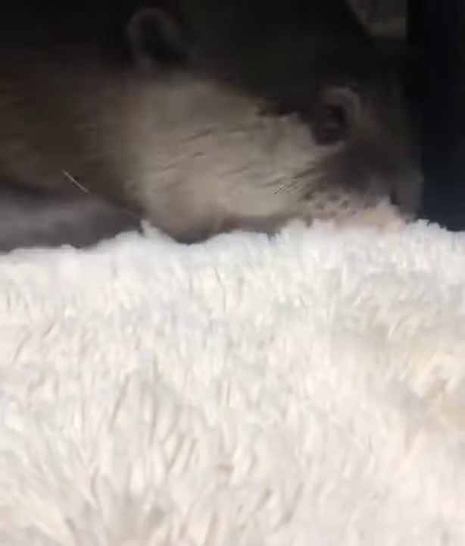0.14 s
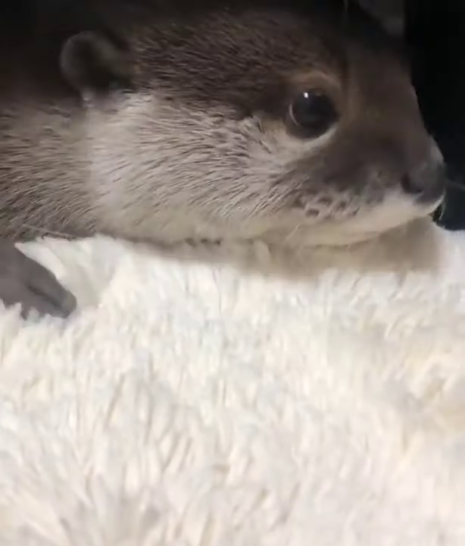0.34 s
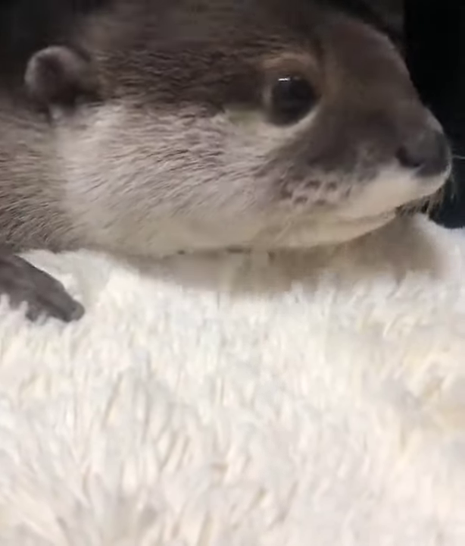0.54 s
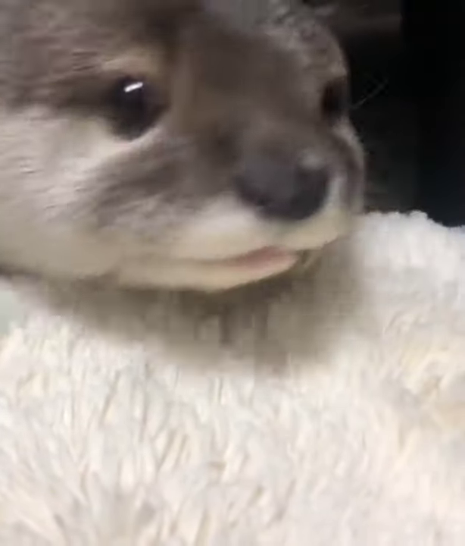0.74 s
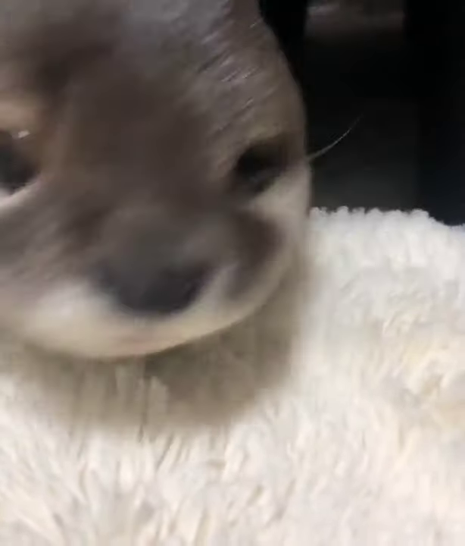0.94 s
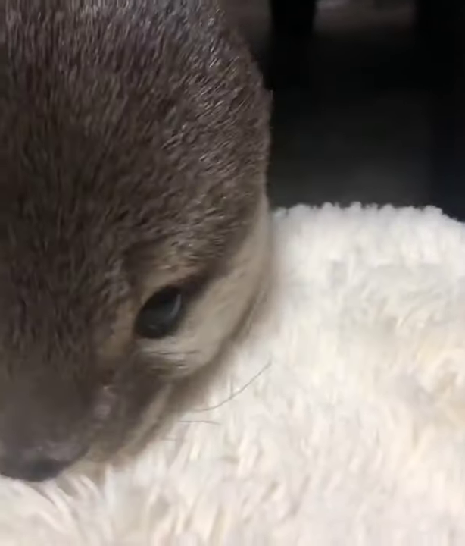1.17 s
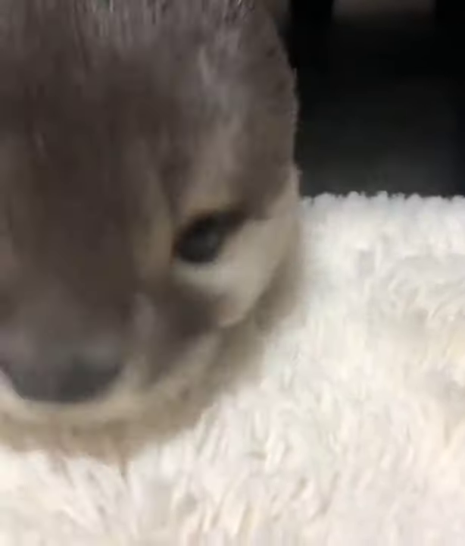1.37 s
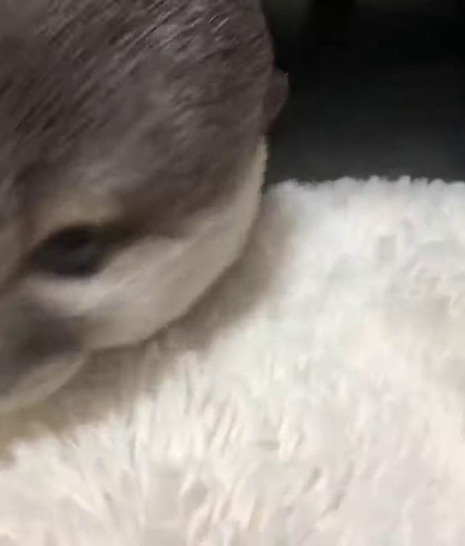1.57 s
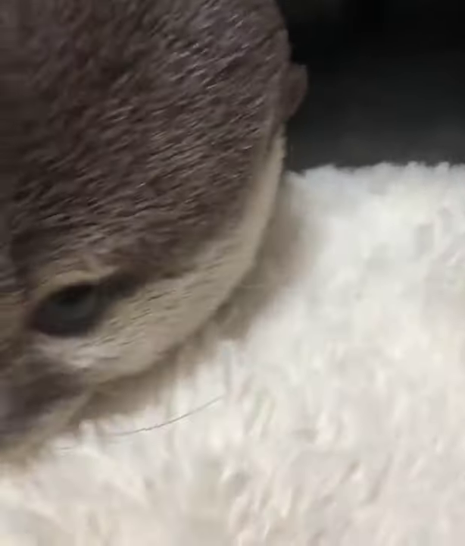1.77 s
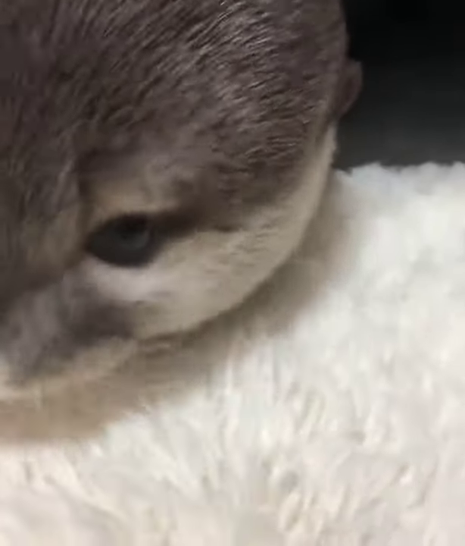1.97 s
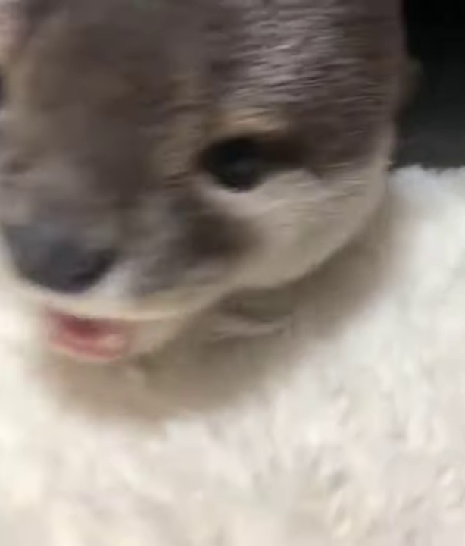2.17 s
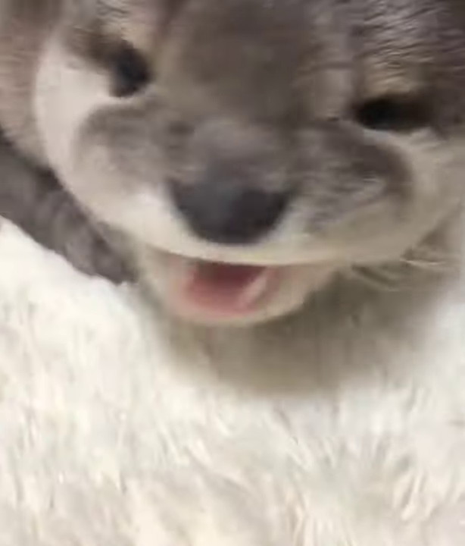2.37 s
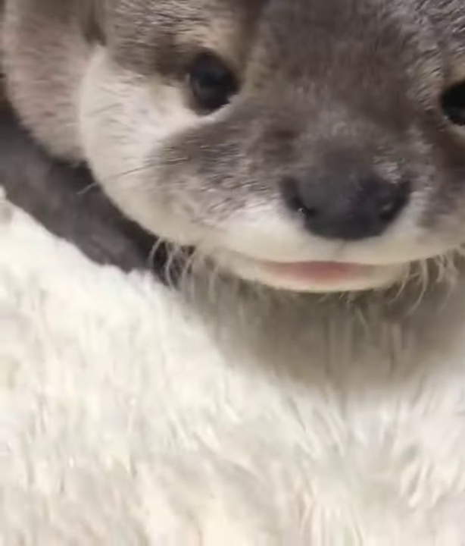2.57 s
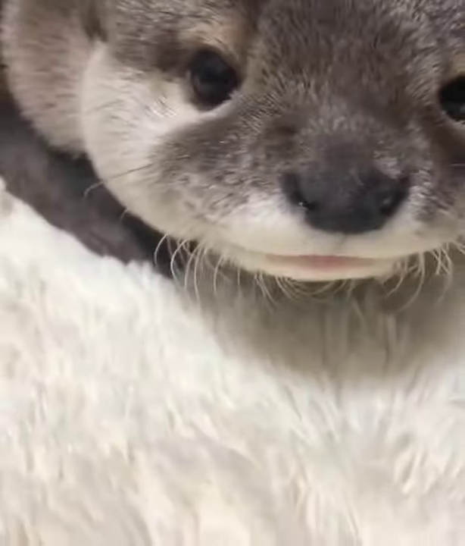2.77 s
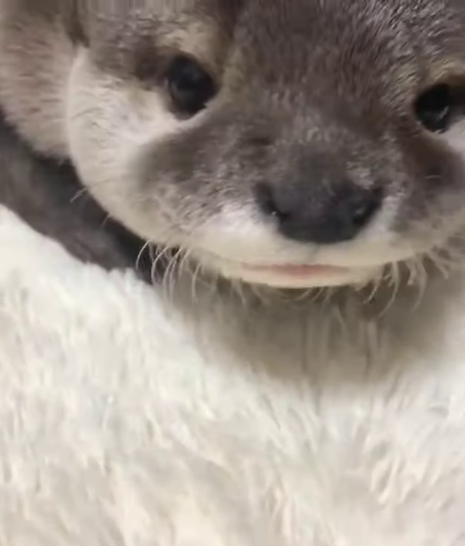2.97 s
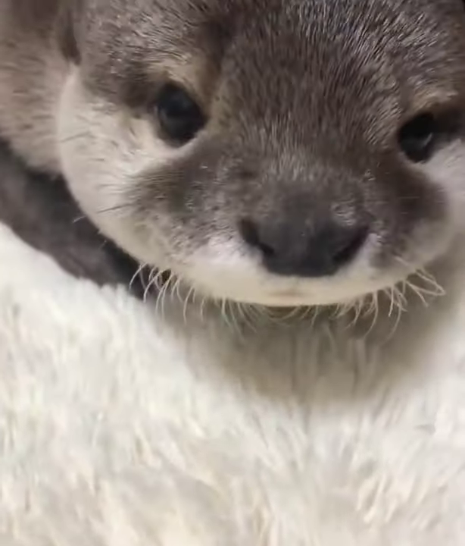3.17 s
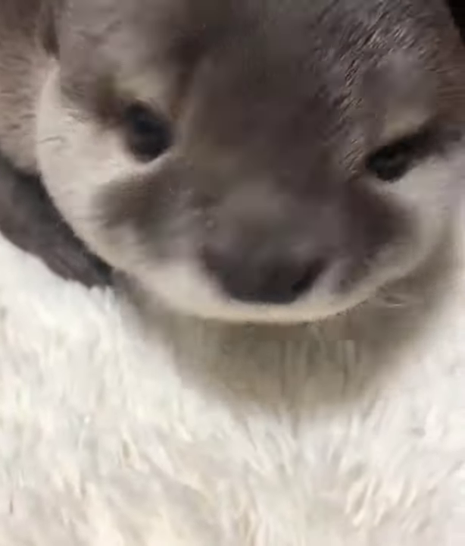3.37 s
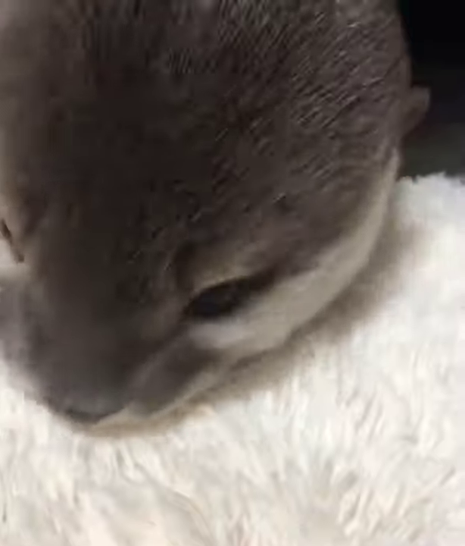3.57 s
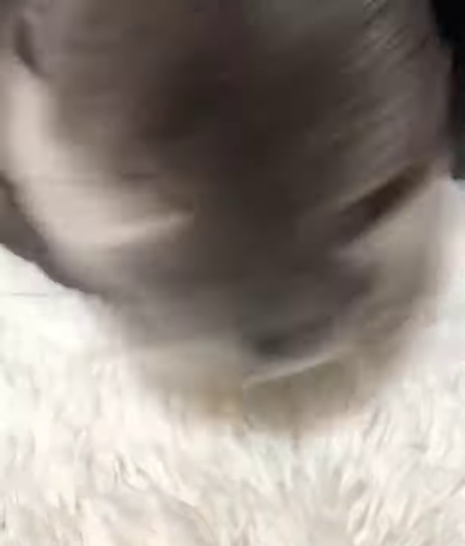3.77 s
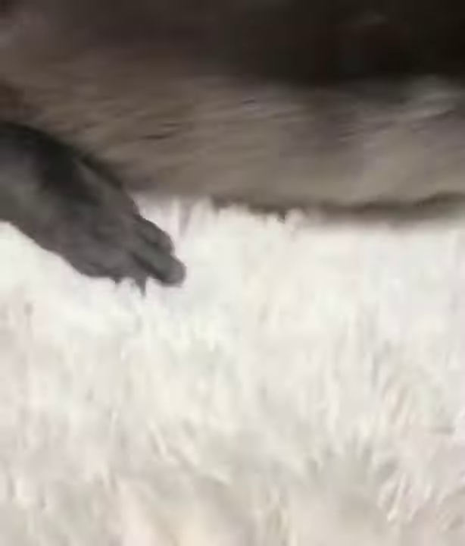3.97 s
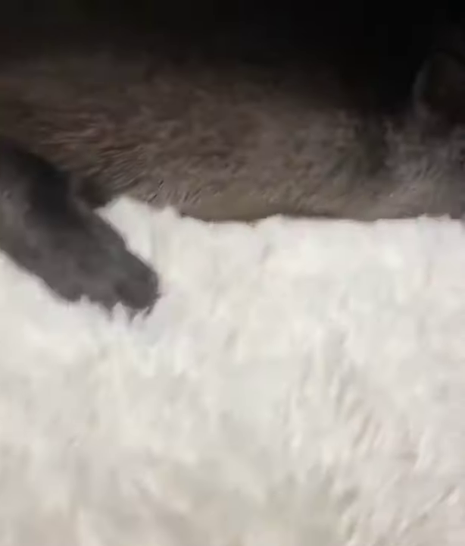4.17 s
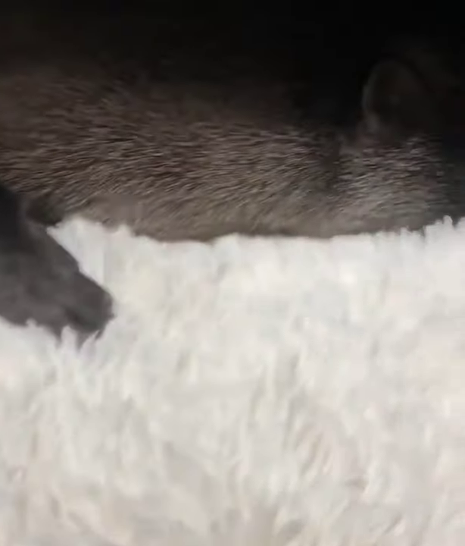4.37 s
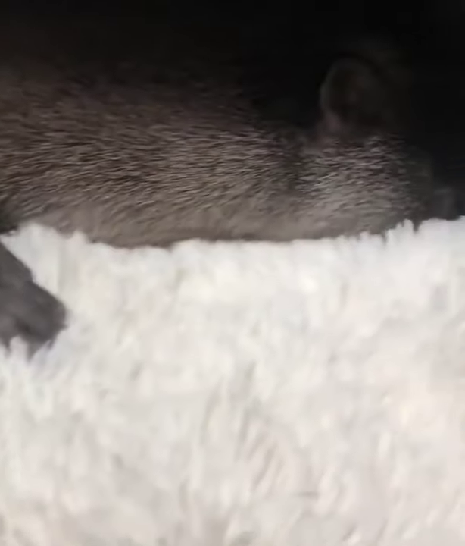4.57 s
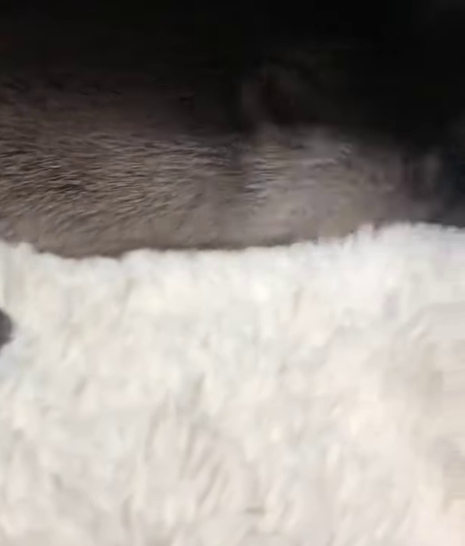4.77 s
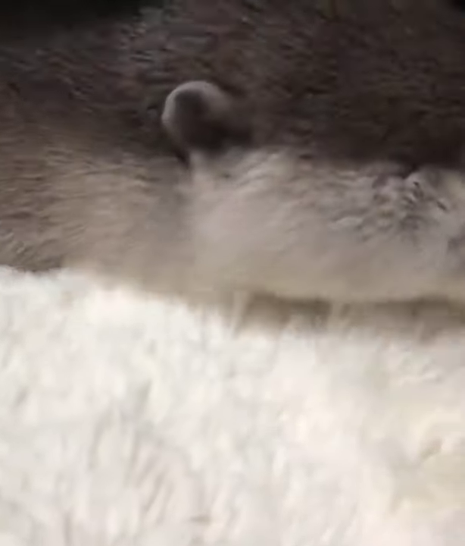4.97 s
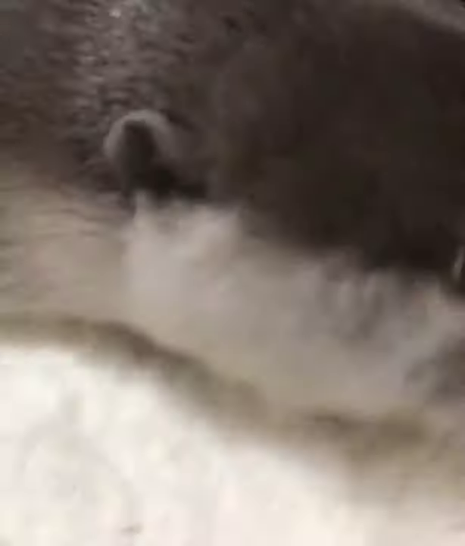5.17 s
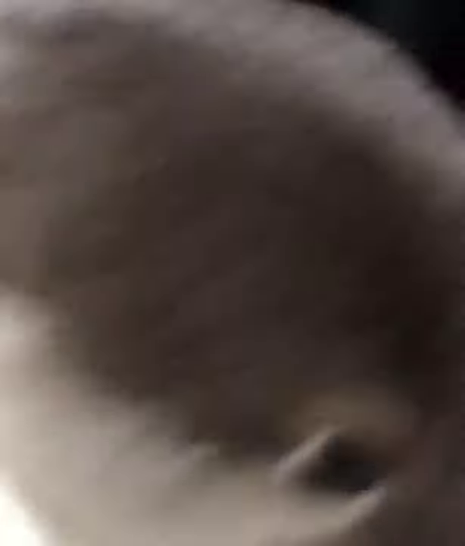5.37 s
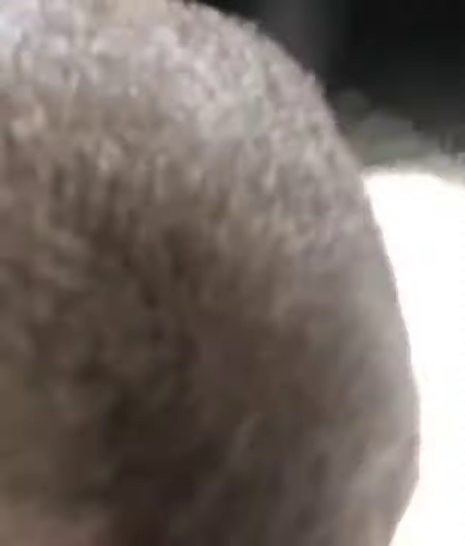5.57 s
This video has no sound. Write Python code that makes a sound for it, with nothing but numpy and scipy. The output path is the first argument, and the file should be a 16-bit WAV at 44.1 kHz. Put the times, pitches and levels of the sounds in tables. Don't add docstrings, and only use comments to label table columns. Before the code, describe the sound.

An otter calls close to a mono microphone in a quiet furnished room, with low house hum, faint hiss and only a slight echo. A tiny soft chirp starts at once; at 0.1 s lone clicks and a creak open a nasal, wavering mew that swells until 1.1 s, shutting with a hum and puff. A short mew, rough at its start, runs from 1.4 to 1.7 s. At 1.95 s a chirp leaps up and drops into a long mew, trembling, then bright and piercing around 2.5 s, sinking to a hum and airy sigh by 3.2 s. Faint whimpers follow. A sharp falling squeak at 3.8 s leads into a hoarse, weaker call until 4.1 s. Fur brushes the blanket very softly; a quiet low chirp comes at 4.5 s. From 4.8 s a creaky opening becomes a higher, steadier mew, growing stronger until about 5.6 s.

```python
import sys
import numpy as np
from scipy import signal
from scipy.fft import rfft, irfft
from scipy.io import wavfile
from scipy.ndimage import uniform_filter1d, minimum_filter1d

SR = 44100
rng = np.random.default_rng(int(sys.argv[2]) if len(sys.argv) > 2 else 0)


def ratio_of_db(decibels):
    return 10 ** (np.asarray(decibels, float) / 20)


def dump_mix(stems):
    frames = np.atleast_2d(stems).T
    limited = np.clip(frames, -1, 1)
    pcm = np.round(limited * 32767).astype(np.int16)
    wavfile.write(sys.argv[1], SR, pcm)


N = 248283
STEP = 16


def rms_one(x):
    return x / np.sqrt(np.mean(x ** 2) + 1e-20)


def band_pass(x, order, low_hz, high_hz):
    return signal.sosfilt(signal.butter(order, [low_hz, high_hz], "band", fs=SR, output="sos"), x)


def high_pass(x, order, edge_hz):
    return signal.sosfilt(signal.butter(order, edge_hz, "high", fs=SR, output="sos"), x)


def drift(rate_hz):
    settle = 9000
    r = np.exp(-2 * np.pi * rate_hz / SR)
    noise = rng.standard_normal(N + settle)
    return rms_one(signal.lfilter([1], [1, -2 * r, r * r], noise)[settle:])


def window(t, start, end, ramp):
    return np.clip(np.minimum(t - start, end - t) / ramp, 0, 1)


def bump(t, at, ms):
    return np.exp(-.5 * ((t - at) * 1000 / ms) ** 2)


def in_order(tables):
    return np.array(sorted(row for table in tables for row in table)).T


def room_tone():
    # f/Hz, level/dB
    floor = [(15, -31.5), (25, 2.5), (334, -4.5), (665, -12.5), (1430, -15), (1590, -15.5), (2850, -32),
             (4130, -36), (4710, -29.5), (9130, -34), (14000, -35.5)]
    hz = np.arange(N // 2 + 1) * SR / N + 1
    points = np.array(floor)
    colour = ratio_of_db(np.interp(np.log(hz), np.log(points[:, 0]), points[:, 1]))
    return ratio_of_db(-65) * rms_one(irfft(rfft(rng.standard_normal(N)) * colour, N))


def creaking(t):
    # start t/s, end t/s, roughness (0-1)
    creaks = [(.018, .066, .48), (.096, .108, .5), (.108, .142, .17), (.142, .165, .9), (.165, .21, .13),
              (.21, .42, .08), (.42, .64, .045), (.64, .86, .02), (.86, .97, .035), (.97, 1.085, .025),
              (1.085, 1.1, .2), (1.368, 1.398, .17), (1.398, 1.442, .8), (1.442, 1.52, .13),
              (1.52, 1.69, .055), (1.69, 1.705, .25), (1.997, 2.03, .5), (2.03, 2.14, .18),
              (2.14, 2.3, .12), (2.3, 2.43, .15), (2.43, 2.455, .2), (2.455, 2.56, .035), (2.56, 2.67, .06),
              (2.67, 3.0, .03), (2.865, 2.89, .03), (3.0, 3.09, .06), (3.056, 3.064, .2), (3.833, 3.85, .3),
              (3.868, 3.9, .17), (3.9, 3.93, .28), (3.93, 3.965, .22), (3.965, 4.02, .26),
              (4.02, 4.045, .14), (4.045, 4.1, .1), (4.8, 4.812, .4), (4.812, 4.832, .25),
              (4.832, 4.866, .65), (4.866, 4.888, .25), (4.888, 4.92, .3), (4.92, 4.97, .15),
              (4.97, 5.2, .06), (5.2, 5.62, .035), (5.62, 5.64, .1)]
    creak = sum(r * window(t, start - .005, end + .005, .01) for start, end, r in creaks)
    wavers_db = 3 * np.clip(1 - 3 * creak, 0, 1) * drift(25)
    return creak * ratio_of_db(wavers_db)


def pitch(t, creak):
    # t/s, f/Hz
    short_pitch = [
        [(.018, 1035), (.065, 935)],
        [(.096, 985.5), (.14, 861), (.165, 957.7), (.21, 868.4)],
        [(1.368, 986), (1.4, 919.2), (1.44, 859.2)],
        [(1.953, 892.4), (1.987, 2078), (1.994, 1908), (2.0, 1336), (2.025, 888)],
        [(3.806, 3394), (3.815, 2740), (3.825, 1284), (3.85, 839)],
        [(3.868, 1395), (3.9, 1168), (3.95, 967), (3.98, 788), (3.993, 831), (4.06, 750.6), (4.09, 769.5),
         (4.118, 807), (4.13, 790)],
        [(4.472, 897), (4.505, 903), (4.522, 652)],
        [(4.8, 860), (4.81, 940), (4.83, 1000), (4.85, 1098), (4.868, 1059), (4.885, 1130), (4.893, 997),
         (4.925, 918.7)],
    ]
    # t/s, f/Hz
    mew_pitch = [
        [(0.215, 849.6), (0.325, 710.9), (0.435, 728.6), (0.545, 752.5), (0.655, 777.4), (0.765, 743.2),
         (0.875, 750.8), (0.985, 716.3), (1.095, 758.5)],
        [(1.452, 848.5), (1.515, 830.6), (1.578, 843.8), (1.642, 796.4), (1.705, 743)],
        [(2.04, 918), (2.122, 828), (2.204, 846.4), (2.286, 800), (2.368, 765), (2.45, 630.3)],
        [(2.455, 846.4), (2.536, 851), (2.616, 753.6), (2.697, 751), (2.778, 689.3), (2.858, 673.3),
         (2.939, 668.7), (3.019, 655.8), (3.1, 631.5)],
        [(4.935, 899.6), (5.021, 949), (5.108, 899.4), (5.194, 943), (5.28, 965), (5.366, 928.8),
         (5.452, 994.7), (5.539, 952.3), (5.625, 960.6)],
    ]
    # t/s, pitch change/%
    catches = [(0.119, 3.5), (0.245, 8.6), (0.316, 2.6), (0.425, 2), (0.492, 6.7), (0.507, 5.2),
               (0.589, 2.6), (0.627, 4.6), (0.903, 5.0), (0.933, 1.8), (1.027, 2.4), (1.6, 2.8),
               (1.622, 6.0), (1.636, 5.1), (2.1, 2.7), (2.138, 3.2), (2.182, 2.9), (2.214, 6.1),
               (2.223, 7.9), (2.231, 4.6), (2.272, 4.4), (2.311, 7.6), (2.324, 15.7), (2.335, 9.4),
               (2.359, 6.9), (2.384, 14), (2.4, 4.5), (2.555, 2.1), (2.572, 10), (2.587, 13), (2.597, 5.8),
               (2.613, 1.1), (2.651, 4.7), (2.727, 1), (2.873, 4.1), (3.894, 8.7), (4.973, 2.2),
               (4.997, 1.8), (5.113, 1.2), (5.151, 2), (5.239, 1.4), (5.249, 3.1), (5.4, 2.2), (5.413, 3.2),
               (5.491, 1.5), (5.54, 2.8), (5.586, 1.8), (5.596, 3.3), (5.607, 1.4)]
    # t/s, pitch change/%
    pushes = [(0.15, 9), (0.287, 4.2), (0.303, 4.0), (0.327, 4.9), (0.335, 8.1), (0.349, 6.4), (0.379, 4.4),
              (0.388, 12.1), (0.409, 5.7), (0.461, 4.7), (0.535, 5.5), (0.692, 3.3), (0.728, 3.3),
              (0.767, 2), (0.786, 5.9), (0.815, 1.9), (0.855, 3.7), (0.884, 1.7), (0.976, 4.5), (1.43, 13),
              (1.463, 3.1), (1.53, 2.5), (1.558, 3.3), (1.652, 2.2), (1.694, 4.5), (1.97, 5.5),
              (2.013, 4.6), (2.086, 1.2), (2.123, 7), (2.256, 4.8), (2.344, 3.7), (2.411, 5.7), (2.42, 9.5),
              (2.436, 12.8), (2.476, 3.2), (2.499, 5.7), (2.525, 2.2), (2.671, 1.4), (2.777, 2.5),
              (2.906, 3), (2.93, 3.0), (3.093, 7.9), (3.934, 10), (4.814, 7.1), (4.846, 4), (4.946, 2.2),
              (5.039, 4.1), (5.129, 2.1), (5.281, 2.8), (5.295, 3.6), (5.317, 1.6), (5.341, 2.7)]
    s, hz = in_order(short_pitch + mew_pitch)
    bend = sum(percent * bump(t, at, 8.0) for at, percent in pushes)
    bend = bend - sum(percent * bump(t, at, 4.4) for at, percent in catches)
    jumps = .06 * np.minimum(creak + .02, .25) * drift(110)
    tremor = (.002 * drift(40) + jumps)[::STEP]
    return np.exp(np.interp(t, s, np.log(hz)) + bend / 100 + tremor)


def tract(t):
    # t/s, effort level/dB, mouth resonance f/Hz, brightness of drawn-back lips/dB
    chirps = [
        [(.018, -50, 2440, -14), (.032, -47.5, 2430, -6), (.046, -36, 2340, -19), (.052, -46, 2160, 2),
         (.064, -47, 2430, -19)],
        [(1.958, -67.5, 2290, -16.5), (1.97, -38.5, 2606, -15), (1.981, -29.5, 2830, -13.5),
         (1.993, -31.5, 2930, -12), (2.001, -21.5, 2325, -26), (2.025, -33, 2500, -16.5)],
        [(3.806, -88.5, 3150, 8.5), (3.814, -57, 3185, 25), (3.822, -18, 3037, -18.5),
         (3.826, -17.5, 2423, -19.5), (3.84, -25, 2475, -11.5), (3.85, -41, 2420, -16)],
        [(4.472, -67, 2000, -17.5), (4.496, -56, 1790, -27), (4.52, -45, 1500, -36)],
    ]
    creaky_phrases = [
        [(.088, -41, 1900, 1), (.112, -41, 1510, 0), (.152, -50, 1800, -1), (.172, -38, 2900, -3.5),
         (.208, -32.5, 3000, -9)],
        [(1.368, -27.5, 2500, -14.5), (1.395, -23, 2540, -20.5), (1.412, -29, 2500, -22),
         (1.436, -26, 2500, -17.5), (1.46, -23, 2500, -15.5), (1.484, -21.5, 2350, -16.5),
         (1.592, -17, 2390, -17), (1.692, -19, 2350, -15.5)],
        [(3.868, -32.5, 2500, -16), (3.897, -25.5, 2700, -14.5), (3.916, -35, 2500, -11),
         (3.97, -32.5, 2100, -10), (4.035, -31.5, 2500, -13), (4.09, -38.5, 2650, -6.5)],
        [(4.8, -40, 1745, -13), (4.86, -43, 2640, -11), (4.876, -40, 3100, -9.5), (4.928, -36, 2400, -12.5),
         (4.952, -30, 2480, -18)],
    ]
    mews = [
        [(.24, -32, 3137, -11.5), (.3, -27.5, 2680, -11), (.33, -24.5, 2500, -8), (.39, -25, 2500, -10.5),
         (.448, -23.5, 2563, -7), (.716, -19, 2640, -3), (.852, -15.5, 2750, -4.5), (1.028, -14, 2830, -10),
         (1.084, -14, 2893, -13.5)],
        [(2.077, -23.5, 2334, -16), (2.173, -18.5, 3065, -7.5), (2.237, -13.5, 3277, -8),
         (2.321, -16, 3553, -4.5), (2.345, -15, 3513, -4.5), (2.369, -18, 3146, -3), (2.39, -21.5, 2955, 1.5),
         (2.415, -17, 3234, -3), (2.44, -20.5, 3360, 0.5)],
        [(2.46, -14, 4484, -0.5), (2.512, -12, 4580, -2.5), (2.54, -11, 4730, -4.5), (2.566, -12, 4860, -6.5),
         (2.585, -13.5, 4630, -3.5), (2.61, -13.5, 4605, 0.5), (2.681, -14.5, 4120, -4.5),
         (2.8, -18, 2880, -3.5), (3.069, -19, 2500, -5)],
        [(5.008, -23.5, 2420, -8), (5.316, -19, 2090, -3), (5.448, -17.5, 2370, -3), (5.52, -15, 2550, -8.5),
         (5.544, -15, 2416, -12), (5.628, -13.5, 2550, -8.5)],
    ]
    # from t/s, mouth width/Hz, palate f/Hz, teeth over palate/dB, nose at mid effort/dB
    postures = [(0, 340, 5600, -21, -45), (.08, 507, 6050, -25.5, -38.5), (.23, 298, 6900, -16, -44.5),
                (.6, 610, 6400, -18, -40.5), (.9, 910, 6090, -18.5, -40.5), (1.3, 431, 5800, -16, -41.5),
                (1.6, 766, 5770, -18, -40.5), (1.9, 600, 6100, -16, -39.5), (2.22, 575, 6350, -16.5, -46),
                (2.448, 544, 5170, -12, -44), (2.602, 1030, 5780, -20.5, -42.5),
                (2.799, 820, 5770, -16.5, -38.5), (3.5, 404.3, 5800, -14, -39.5),
                (3.86, 446, 5840, -31, -45.5), (4.0, 600, 6360, -23.5, -46.5), (4.3, 3020, 5840, -1.5, -36),
                (4.7, 499, 5980, -27, -35), (4.9, 349, 6000, -13.5, -38), (5.0, 304, 5740, -18, -41.5),
                (5.2, 302, 5750, -15.5, -39.5), (5.43, 297, 5980, -17, -38)]
    # t/s, level/dB, width/ms
    pips = [
        (0.025, -48, 2.5),
        (.046, -55, 1.9),
        (1.377, -39.5, 4.4),
        (1.985, -24, 8),
        (3.815, -10.5, 3.22),
        (3.9, -44, 49),
        (4.491, -42.5, 15.5),
    ]
    # start t/s, length/s, hum level/dB
    closings = [
        (1.085, 0.014, -27),
        (1.694, 0.02, -26.5),
        (3.064, 0.056, -32),
        (4.09, 0.0465, -36),
        (4.507, 0.014, -38),
    ]
    mid_effort_db, mid_bright_db, widest_hz = -20.5, -9, 2500
    hum_peak = .65

    s, *controls = in_order(chirps + creaky_phrases + mews)
    mouth_db, mouth_hz, bright_db = (np.interp(t, s, c) for c in controls)
    postures = np.array(postures)
    held = postures[np.maximum(np.searchsorted(postures[:, 0], t, "right") - 1, 0)]
    change_s = 0.036
    moving = uniform_filter1d(held, int(change_s * SR / STEP), axis=0)
    _, width_hz, palate_hz, teeth_db, nose_db = moving.T

    octaves = (np.minimum(bright_db, 0) - mid_bright_db) / 8.5
    width_hz = np.minimum(width_hz * 2 ** octaves, widest_hz)
    nose_db = nose_db + .7 * (mouth_db - mid_effort_db)
    nose_db = 20 * np.log10(ratio_of_db(nose_db) + sum(ratio_of_db(db) * bump(t, at, ms) for at, db, ms in pips))

    for start, length, hum_db in closings:
        done = (t - start) / length * (t < start + 2 * length)
        shut = np.clip(done / hum_peak, 0, 1)
        fade_db = 29 * np.clip(done - hum_peak, 0, 1) / (1 - hum_peak)
        nose_open = np.minimum(1.6 * shut, 1)
        nose_db = nose_db + nose_open * (hum_db - nose_db) - fade_db
        mouth_db = mouth_db - 25.5 * shut
        bright_db = bright_db - 6.5 * shut
        width_hz = width_hz + shut * (widest_hz - width_hz)
    palate_db = mouth_db + bright_db
    return nose_db, mouth_db, mouth_hz, width_hz, palate_db, palate_hz, palate_db + teeth_db


def resonance(hz, centre_hz, width_hz):
    return 1j * hz * width_hz / (centre_hz ** 2 - hz ** 2 + 1j * hz * width_hz)


def cavity_shapes(hz, f0, mouth_hz, width_hz, palate_hz):
    # f/Hz, width/Hz, level/dB
    tooth_gaps = [(8740, 1300, -4), (11094, 950, 0), (13740, 1300, -5)]

    def above(edge_hz):
        return 1 / (1 + (edge_hz / hz) ** 12)

    nose = 1. * (hz == f0)
    mouth_top_hz = np.minimum(5200, 1.486 * mouth_hz + width_hz)
    mouth = (1 - nose) * (resonance(hz, mouth_hz, width_hz) + 0.008) * (1 - above(mouth_top_hz))
    palate_top_hz = 6930 + 0.58 * mouth_hz
    palate = (nose - 1) * above(4100) * (resonance(hz, palate_hz, 480) + 0.63)
    palate = palate * (1 - above(palate_top_hz)) ** 2
    gaps = sum(ratio_of_db(db) * resonance(hz, centre, width) ** 2 for centre, width, db in tooth_gaps)
    teeth = above(6900) * gaps * (hz < 14200) * (1 - resonance(hz, 12300, 900))
    return nose, mouth, palate, teeth


def pockets(t, hz):
    # start t/s, end t/s, f at start/Hz, f at end/Hz, level/dB (- swallows, + lifts)
    side_pockets = [(0.55, 0.823, 7750, 7690, 6), (0.61, 1.003, 8426, 7500, -3.5),
                    (0.5, 1.001, 1400, 1400, -3.5), (1, 1.092, 4847, 4920, -13),
                    (1.433, 1.633, 3500, 3220, -11), (1.6, 1.72, 4000, 3600, 5.5),
                    (1.7, 1.71, 8760, 8650, -15.5), (2.035, 2.22, 3474, 4424, -9),
                    (1.7, 2.272, 7910, 7650, -2.5), (2.1, 2.31, 9140, 9060, 10.5),
                    (2.6, 2.495, 13400, 9930, -14.5), (2.329, 2.442, 3940, 3826, -4.5),
                    (2.346, 2.462, 4697, 4630, 11), (2.49, 2.6, 2725, 2000, 8),
                    (2.489, 2.581, 3624, 3270, -11.5), (2.518, 2.556, 1720, 1666, 9),
                    (2.492, 2.615, 7136, 7020, -21.5), (2.601, 2.666, 6285, 5900, -16),
                    (2.654, 3.09, 7155, 7680, -18), (2.67, 2.5, 5860, 5530, 0.5),
                    (2.453, 2.7, 12580, 11845, -18), (2.547, 3.08, 10430, 8810, -9),
                    (3.87, 4.2, 3770, 3600, -11), (3.9, 4.1, 4800, 5500, -11),
                    (0.169, .56, 4940, 4460, -0.5), (0.28, 0.549, 1850, 2000, -6.5),
                    (2.9, 3.081, 4340, 4264, 5.5), (2.2, 2.52, 13800, 13800, -8),
                    (4.9, 5.501, 13500, 17000, -8), (3.88, 4.097, 13000, 13060, 11),
                    (0.7, 1.09, 4100, 3700, 2.5), (.02, 0.11, 5300, 4300, -8), (4.06, 4.12, 4000, 3900, 9),
                    (2.04, 2.19, 5000, 5400, -8), (4.93, 5.097, 4120, 3600, -19),
                    (5.1, 5.34, 3840, 3760, 8.5), (4.94, 5.64, 6660, 7200, -9.5), (4.9, 5.1, 6830, 7360, 8),
                    (5.3, 5.63, 7700, 11000, -11), (5.153, 5.626, 11400, 14000, 4.5)]
    width, opens_s = 0.048, 0.022
    db = np.zeros(hz.shape)
    for start, end, from_hz, to_hz, depth_db in side_pockets:
        first, last = start - opens_s, end + opens_s
        on = slice(*np.searchsorted(t, [first, last]))
        centre_hz = np.interp(t[on], [start, end], [from_hz, to_hz])
        off = np.log(hz[:, on] / centre_hz) / width
        db[:, on] += depth_db * np.exp(-.5 * off ** 2) * window(t[on], first, last, 2 * opens_s)
    return ratio_of_db(db)


def voice():
    # start t/s, end t/s, attack/ms
    call_spans = [
        (0.016, 0.065, 5),
        (0.096, 1.097, 3),
        (1.368, 1.709, 5.7),
        (1.947, 3.113, 5),
        (3.809, 3.847, 2.4),
        (3.869, 4.134, 1.5),
        (4.472, 4.531, 5.6),
        (4.8, 5.64, 2.2),
    ]
    # low f/Hz, high f/Hz
    rasp_bands = [(350, 2500), (2050, 3700), (4400, 7400), (8000, 11400)]
    t, full = np.arange(0, N, STEP) / SR, np.arange(N) / SR
    nose_db, mouth_db, mouth_hz, width_hz, palate_db, palate_hz, teeth_db = tract(t)
    creak = creaking(full)
    f0 = pitch(t, creak)
    hz = f0 * np.arange(1, 23)[:, None]
    nose, mouth, palate, teeth = cavity_shapes(hz, f0, mouth_hz, width_hz, palate_hz)
    # shape, level/dB, breathiness, unsteadiness of each partial/dB, how strongly creak shows
    cavities = [(nose, nose_db, .001, .4, .3), (mouth, mouth_db, .008, 1.2, .9),
                (palate, palate_db, .12, 2.2, 2.25), (teeth, teeth_db, .3, 5, 3.5)]
    unsteady = np.array([np.interp(t * 18, np.arange(200), rng.standard_normal(200)) for partial in hz])

    cycles = np.cumsum(np.interp(full, t, f0)) / SR
    slip = np.interp(cycles, np.arange(N), rng.standard_normal(N))
    turn = np.exp(2j * np.pi * (cycles + .11 * creak ** 1.5 * slip))
    partials = np.cumprod(np.broadcast_to(turn.astype(np.complex64), (len(hz), N)), axis=0)
    side = pockets(t, hz)
    halved = np.cos(np.pi * cycles) * drift(25)

    out = np.zeros(N)
    for (shape, level_db, breath, spread_db, hoarse), (low_hz, high_hz) in zip(cavities, rasp_bands):
        sum_db = 10 * np.log10(np.sum(abs(shape) ** 2, axis=0) / 2 + 1e-9)
        usual_db = uniform_filter1d(sum_db, int(.06 * SR / STEP))
        swell_db = np.clip(sum_db - usual_db, -5, 5)
        shape = shape * side * ratio_of_db(level_db + spread_db * unsteady + 0.31 * swell_db - sum_db)
        tone = sum(np.real(np.interp(full, t, h) * p) for h, p in zip(shape, partials) if abs(h).max() > 3e-5)
        rough = np.clip(np.hypot(hoarse * creak * (1 + 6 * creak ** 3), breath), 0, 1)
        strengths = np.interp(2 * cycles, np.arange(N), rng.standard_normal(N))
        rasp = tone * rough * (strengths * 0.9 + .6 * halved)
        out += tone * np.sqrt(1 - rough ** 2) + band_pass(rasp, 3, low_hz, high_hz)

    release_s = 0.0044
    out *= sum(np.clip(np.minimum((full - start) * 1000 / ms, (end - full) / release_s + 1), 0, 1)
               for start, end, ms in call_spans)
    return -high_pass(out, 3, 330)


def room(x, early_t60, late_t60, late_db):
    t = np.arange(SR // 2) / SR
    early = rng.standard_normal(len(t)) * ratio_of_db(-60 * t / early_t60)
    dull = signal.lfilter(*signal.butter(1, 3500, fs=SR), rng.standard_normal(len(t)))
    late = dull * ratio_of_db(late_db - 60 * t / late_t60)
    echo = (early + late) * (t > .004)
    return signal.fftconvolve(x, echo / np.sqrt(np.sum(echo ** 2)))[:N]


def slaps():
    # t/s, peak level/dB
    lone_slaps = [
        (.0882, -34),
        (.0938, -36),
        (.1535, -40),
        (.1585, -38),
    ]
    t, out = np.arange(200) / SR, np.zeros(N + 200)
    swell = t / .0005 * np.exp(1 - t / .0005)
    ring = np.sin(2 * np.pi * 1400 * t) + .6 * np.sin(2 * np.pi * 2700 * t) + .3 * np.sin(2 * np.pi * 6000 * t)
    pulse = swell * ring / 1.5
    for at, db in lone_slaps:
        first = int(at * SR)
        out[first:first + len(t)] += ratio_of_db(db) * pulse
    return out[:N]


def pops():
    # t/s, level/dB, width/ms
    air_pops = [
        (.15, -60, 18),
        (1.099, -56, 14.5),
        (1.422, -54, 28.5),
        (1.705, -56, 8.3),
        (2.01, -61, 19),
        (3.82, -56.5, 11),
    ]
    t = np.arange(N) / SR
    low = band_pass(rng.standard_normal(N), 2, 110, 420)
    return rms_one(low) * sum(ratio_of_db(db) * bump(t, at, ms) for at, db, ms in air_pops)


def puffs():
    # start t/s, end t/s, level/dB, fall/dB per s, top f/Hz
    nostril_puffs = [
        (1.09, 1.126, -46.5, 311.5, 7680),
        (1.692, 1.735, -48, 350, 5000),
        (1.35, 1.37, -63, -300, 4000),
        (3.056, 3.195, -46.5, 152, 6850),
        (3.864, 3.883, -60.5, -1, 5000),
        (4.092, 4.189, -63.5, 96, 8070),
    ]
    t, out = np.arange(N) / SR, np.zeros(N)
    for start, end, level_db, fall_db, top_hz in nostril_puffs:
        hiss = band_pass(rng.standard_normal(N), 2, 1200, top_hz)
        fading = ratio_of_db(level_db - fall_db * np.clip(t - start, 0, 1))
        out += rms_one(hiss) * fading * window(t, start, end, 0.0071)
    return out


def rustle():
    # t/s, level/dB
    strokes = [
        [(1.12, -82), (1.36, -75)],
        [(1.73, -73), (1.95, -72)],
        [(3.13, -82.5), (3.8, -71)],
        [(4.14, -64.5), (4.47, -78)],
        [(4.53, -71.5), (4.8, -77)],
    ]
    s, level_db = np.concatenate(strokes).T
    band = band_pass(rng.standard_normal(N), 3, 1000, 3700)
    return rms_one(band) * ratio_of_db(np.interp(np.arange(N) / SR, s, level_db) - 2.5 + 3 * drift(12))


def whimpers():
    # start t/s, end t/s, f at start/Hz, f at end/Hz, level/dB, brightness/dB per partial
    soft_tones = [
        (3.594, 3.675, 865, 885, -65, -4.5),
        (3.747, 3.824, 890, 880, -63, -3),
        (4.194, 4.3, 915, 840, -70, 0.5),
        (4.518, 4.616, 1140, 1260, -67, -14),
        (4.519, 4.63, 883, 910, -93, 8),
        (4.732, 4.811, 806, 900, -75, 3),
        (3.471, 3.576, 1145, 1520, -68, -7),
    ]
    t, out = np.arange(N) / SR, np.zeros(N)
    for start, end, from_hz, to_hz, level_db, tilt_db in soft_tones:
        glide_hz = np.interp(t, [start, end], [from_hz, to_hz])
        cycles = np.cumsum(glide_hz * (1 + 0.011 * drift(40))) / SR
        tone = sum(ratio_of_db(level_db + tilt_db * k) * np.sin(2 * np.pi * (k + 1) * cycles) for k in range(4))
        grain = .6 + .7 * drift(90)
        out += tone * window(t, start, end, .03) * grain
    return out


def drop_masked(x):
    # f/Hz, level/dB
    masked = [(600, -49.5), (1500, -45), (3000, -36), (6000, -26.5), (10000, -20.5), (14000, -16)]
    reach_bins, treble_hz = 22, 7800
    hz, _, frames = signal.stft(np.pad(x, (0, 2048), "reflect"), SR, nperseg=1024)
    power = uniform_filter1d(uniform_filter1d(abs(frames) ** 2, size=3, axis=0), size=2, axis=1)
    level_db = 10 * np.log10(power + 1e-18)
    loudest_db = -minimum_filter1d(-level_db, size=2 * reach_bins + 1, axis=0)
    chance = uniform_filter1d(rng.standard_normal(frames.shape), size=11, axis=0)
    wavers_db = 4 * rms_one(uniform_filter1d(chance, size=5, axis=1))
    limit_db = loudest_db + np.interp(hz, *np.transpose(masked))[:, None]

    treble = hz > treble_hz
    treble_limit_db = 1.5 * level_db.max(axis=0) - 32 - .0012 * (hz[treble, None] - treble_hz)
    limit_db[treble] = np.maximum(limit_db[treble], treble_limit_db)

    quiet = level_db.max(axis=0) < -60
    quiet[-7:] = True
    kept = np.clip((level_db - limit_db - wavers_db) / 4 + .5 + 9 * quiet, 0, 1)
    return signal.istft(frames * ratio_of_db(-25 * (1 - kept)), SR, nperseg=1024)[1][:N]


def scene():
    otter = voice()
    echo = ratio_of_db(-28.5) * room(otter, early_t60=0.13, late_t60=0.4, late_db=-18)
    mono = room_tone() + otter + echo + slaps() + pops() + puffs() + rustle() + whimpers()
    return np.stack([mono, mono])


def low_pass(x):
    return signal.sosfilt(signal.butter(12, 14100, fs=SR, output="sos"), x)


def record(dry):
    held = dry / (1 + abs(dry / .76) ** 6) ** (1 / 6)
    heard = high_pass(held, 4, 58)
    mix = np.stack([drop_masked(heard[0])] * 2)
    return low_pass(mix)


dry = scene()
out = record(dry)
dump_mix(out)
```